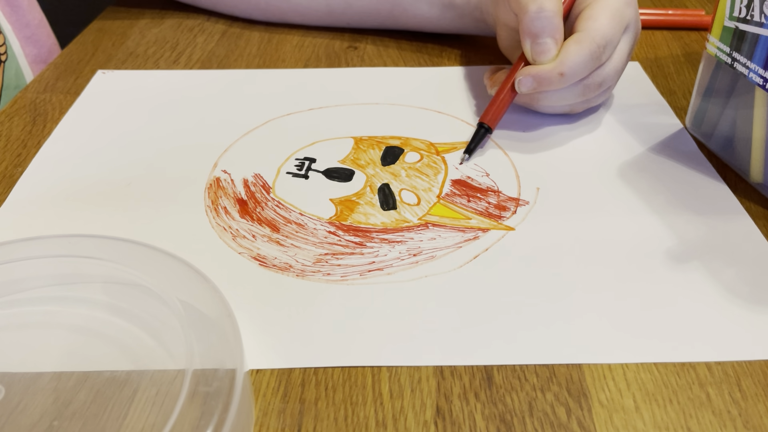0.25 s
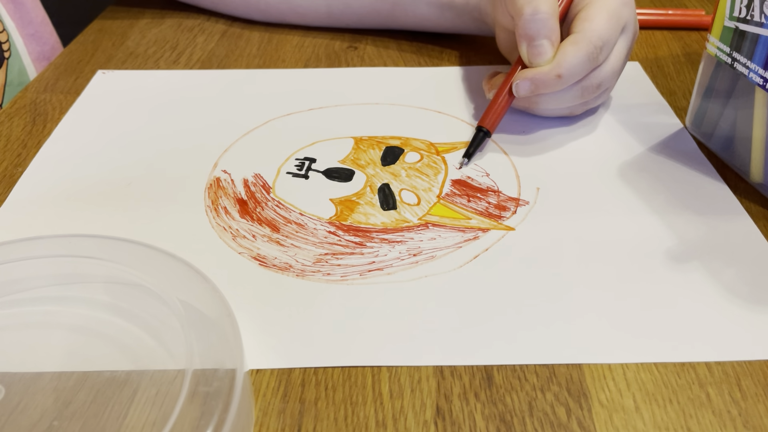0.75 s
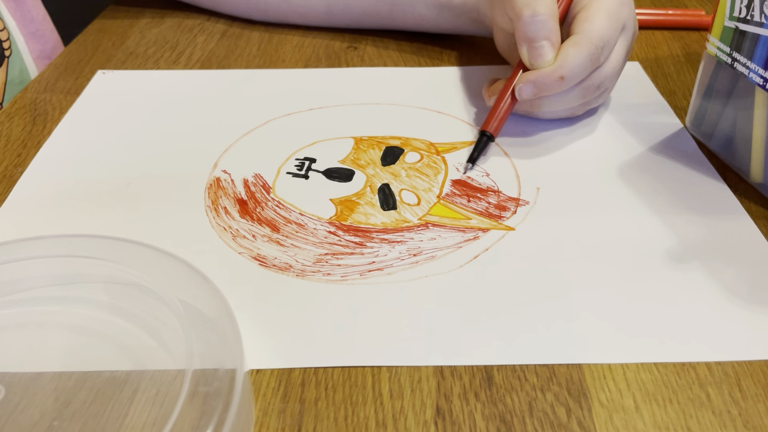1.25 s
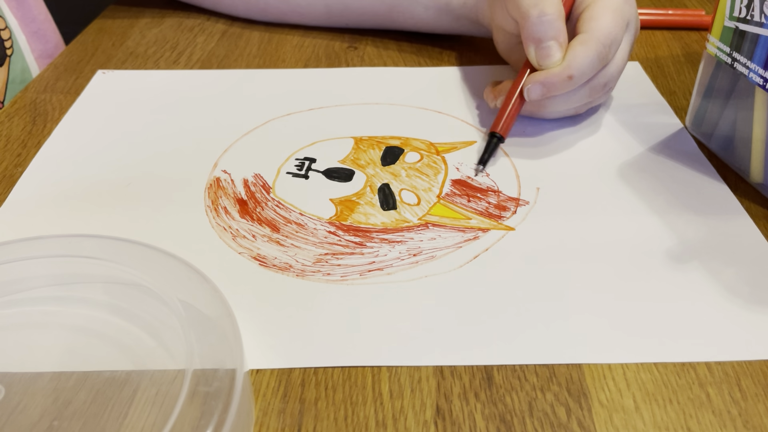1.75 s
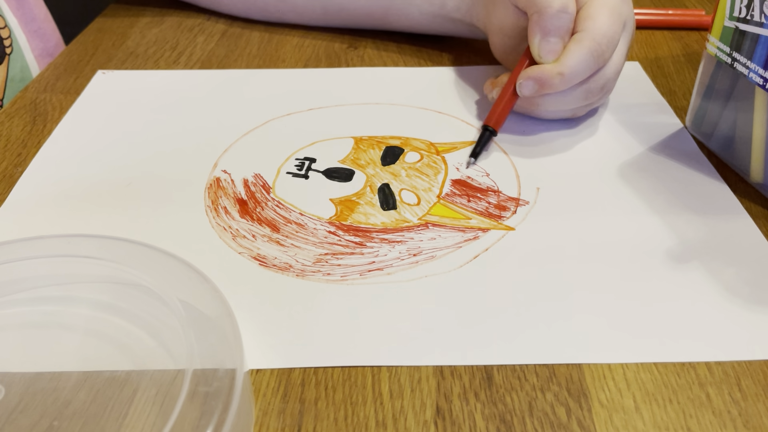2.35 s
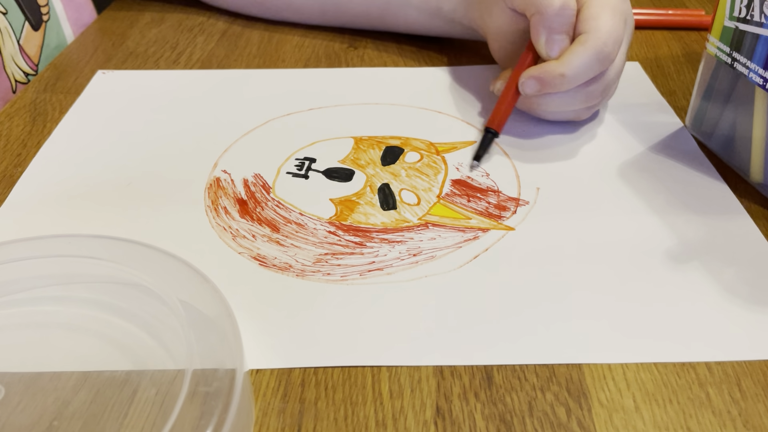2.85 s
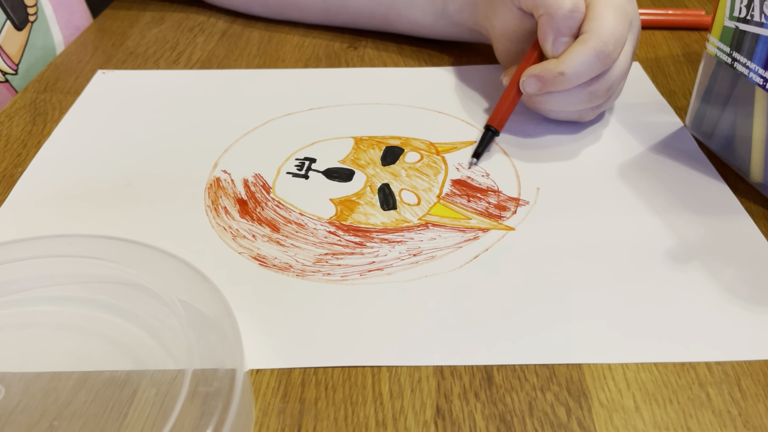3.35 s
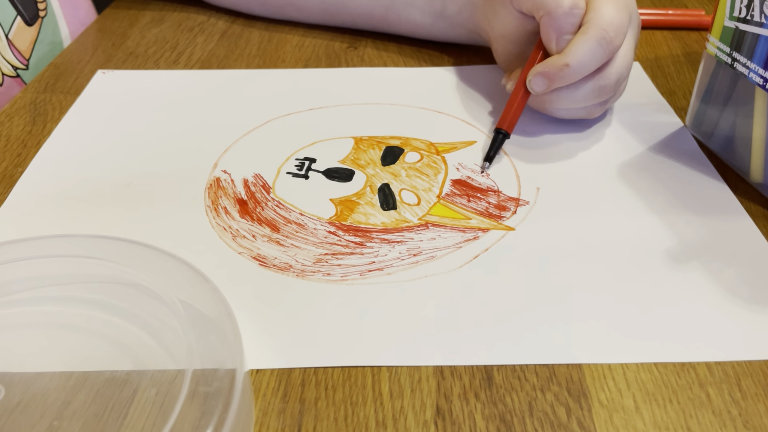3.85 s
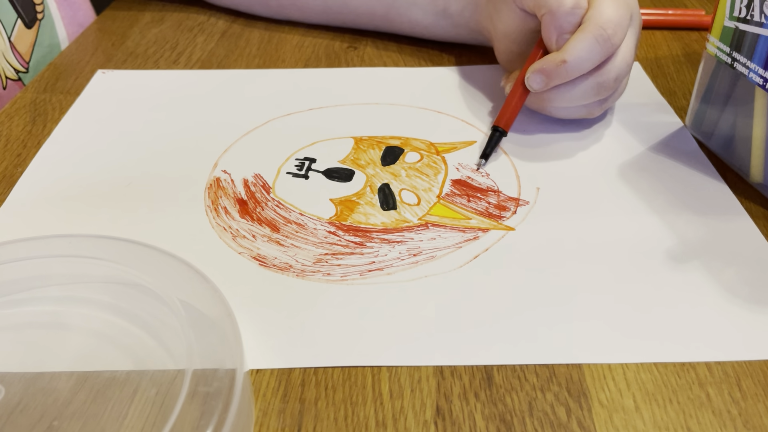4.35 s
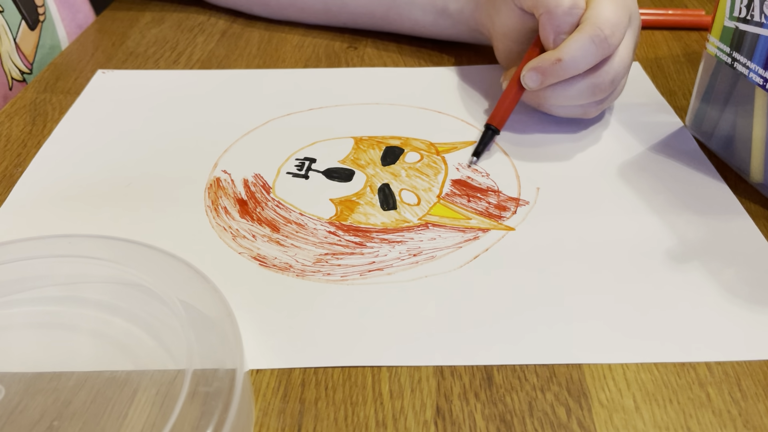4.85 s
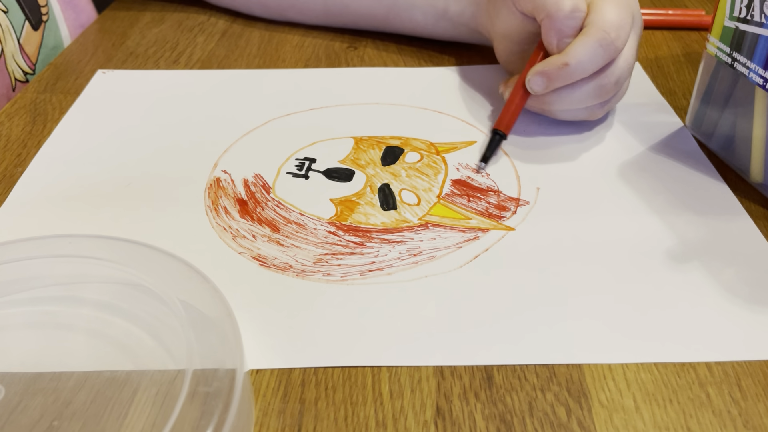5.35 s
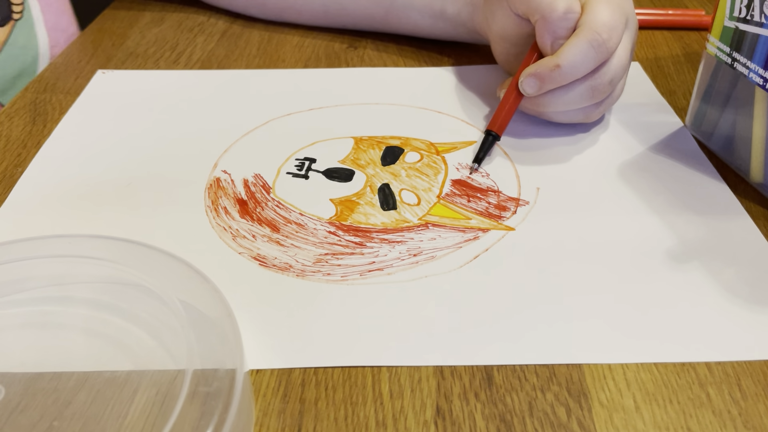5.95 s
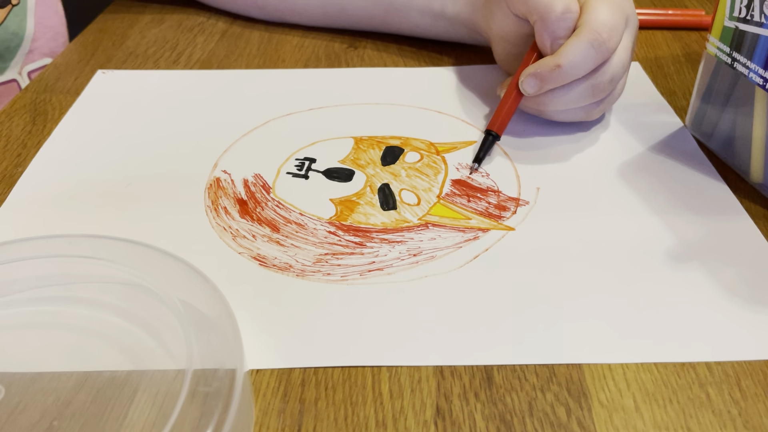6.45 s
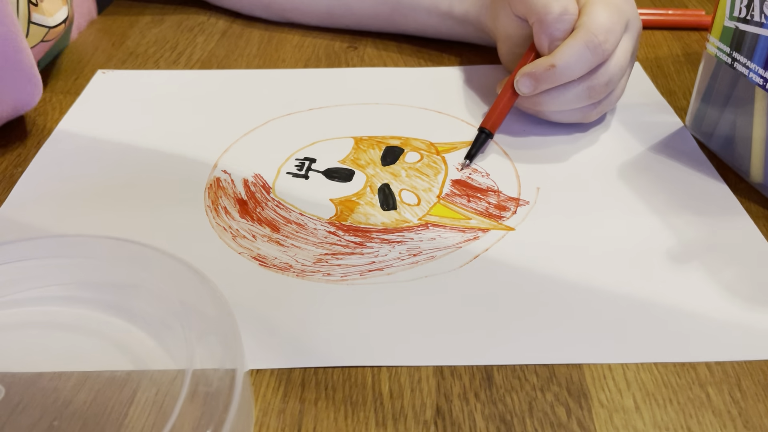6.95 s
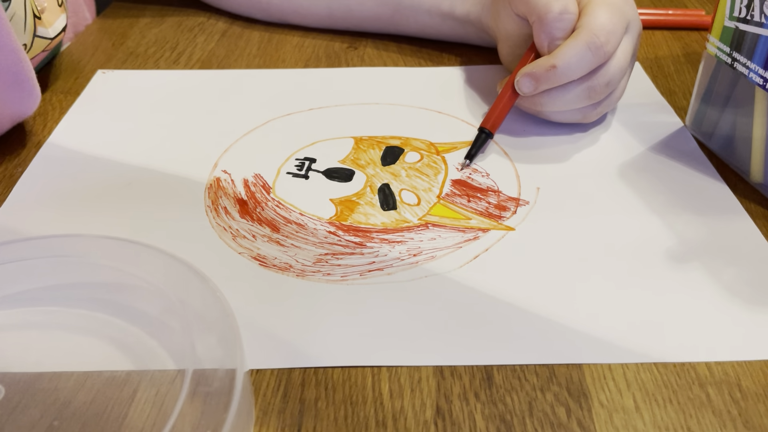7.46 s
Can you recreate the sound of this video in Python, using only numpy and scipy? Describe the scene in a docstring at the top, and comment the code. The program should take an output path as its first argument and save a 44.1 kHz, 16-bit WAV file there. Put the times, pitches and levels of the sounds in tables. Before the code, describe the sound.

A low, steady motor hum and soft, regularly returning water swishes fill a small room, probably from a dishwasher. Near a stereo microphone, a felt-tip nib hisses back and forth on paper, faintly first, then firm and fast, then smoother and lighter. The hand rubs dully, the table thuds softly, and after the last stroke skin brushes the sheet with crisp ticks and rustles.

```python
"""Throughout, a machine across the room, probably a dishwasher, hums while its spray arm swishes evenly round.
A felt-tip pen scribbles on a sheet on a wooden table, close to a two-port microphone: faint strokes at first,
then firmer ones from about 1.6 s as the nib grips the fibres, and mostly gliding ones after 2.3 s.
Each stroke tugs the hand, which rubs dully on the sheet; now and then the table booms or the paper snaps.
The hand slides briefly near 1 s and 4 s, and at length after the last stroke, from 5.65 s on."""
import sys
import numpy as np
from scipy import signal
from scipy.fft import rfft, irfft, next_fast_len
from scipy.io import wavfile
from scipy.ndimage import uniform_filter1d, map_coordinates

SR = 44100
rng = np.random.default_rng(int(sys.argv[2]) if len(sys.argv) > 2 else 0)


def wav_out(sig):
    """Save sig, one row per channel (or a flat mono array), as 16-bit PCM at SR to the path in sys.argv[1]."""
    wavfile.write(sys.argv[1], SR, np.round(np.clip(np.atleast_2d(sig).T, -1, 1) * 32767).astype(np.int16))


N = 339215
TOP_HZ = 15740  # upper limit of the recorder's band
ARCH_DB = 3  # the nib is fastest in the middle of a stroke: hiss, rasp and rub swell by this much

# pen strokes, levels before the swell, the lean and the balance of grip and glide:
# start_s, length_s, nib_hiss_db, paper_rasp_db, hand_rub_db, lean_db (end minus start)
STROKES = [(0.08, 0.031, -92, -108.0, -91.0, -2.0), (0.29, 0.032, -78, -91, -76, -3),
           (0.698, 0.047, -91, -103.0, -86, 0.0), (0.995, 0.046, -77.5, -92, -74, 8),
           (1.146, 0.047, -81.0, -95, -90, -4.0), (1.267, 0.072, -77, -95, -81, 3),
           (1.45, 0.052, -75, -90.5, -87.0, 5), (1.554, 0.055, -73.5, -93, -77, -4),
           (1.685, 0.045, -64.5, -82, -71.0, 0), (1.766, 0.066, -66.5, -80.0, -68.5, -3.5),
           (1.883, 0.065, -68, -85, -69.5, -7), (1.983, 0.088, -71, -88.5, -75, 8),
           (2.118, 0.07, -66, -82.5, -81.0, 3), (2.229, 0.064, -66.5, -79, -75, -6),
           (2.369, 0.097, -68, -82, -82, -8), (2.487, 0.099, -69.0, -77, -76.5, -1.0),
           (2.623, 0.086, -66.5, -74.5, -76, 7.5), (2.733, 0.079, -66, -75.0, -64.0, 4),
           (2.882, 0.088, -70, -79, -70, -12), (2.999, 0.082, -70, -78.5, -65.5, 1),
           (3.121, 0.073, -68.0, -77.5, -65, 3.5), (3.238, 0.074, -68.5, -80.0, -72.5, -1),
           (3.374, 0.094, -72, -87.0, -74.5, 2.0), (3.541, 0.07, -67.5, -81.5, -66.5, -3),
           (3.677, 0.084, -71.5, -83.5, -68, -6), (3.784, 0.073, -71.0, -84.5, -78.0, -2.0),
           (3.937, 0.073, -73, -86, -70, 2), (4.08, 0.055, -74.5, -91, -68.5, 1),
           (4.197, 0.08, -72, -88, -68.5, 5.0), (4.315, 0.055, -70.5, -96.0, -73.0, -2.0),
           (4.45, 0.073, -72.5, -90, -74.5, 1.0), (4.579, 0.079, -77, -89.5, -75.0, 7),
           (4.745, 0.068, -76.0, -92, -77, 5), (4.911, 0.093, -77.5, -92, -80, -8),
           (5.045, 0.062, -75.5, -94.0, -78, -3), (5.176, 0.072, -75.5, -85.0, -69, 4),
           (5.269, 0.088, -77, -88.5, -74, 7), (5.38, 0.086, -76, -87, -73.5, -9),
           (5.5, 0.085, -70.5, -84.5, -68.5, 0), (5.608, 0.055, -70.5, -82, -69, -4)]


def amp(db):
    """Decibels to gain."""
    return 10 ** (np.asarray(db) / 20)


def unit(x):
    """Scale to rms 1."""
    return x / np.sqrt(np.mean(x ** 2) + 1e-30)


def along(points, hz):
    """Read (Hz, value) points on a log frequency axis."""
    f, v = np.transpose(points)
    return np.interp(np.log(hz + 1), np.log(f + 1), v)


def clock():
    """Time of every sample, in seconds."""
    return np.arange(N) / SR


def curves(rows):
    """One value per sample for each column after the time."""
    s, *cols = np.transpose(rows)
    return [np.interp(clock(), s, c) for c in cols]


def wobble(rate):
    """A smooth random curve, rate knots a second."""
    knots = rng.standard_normal(int(N * rate / SR) + 4)
    return map_coordinates(knots, [np.arange(N) * rate / SR])


def gate(t, start, end, rise, fall):
    """A window with soft flanks centred on start and end."""
    opening = (1 + np.tanh((t - start) / rise)) / 2
    closing = (1 + np.tanh((end - t) / fall)) / 2
    return opening * closing


def surge(s, rise, hold, fall):
    """An envelope that climbs to 1 at time s, holds and dies away."""
    t = clock() - s
    exponent = np.where(t < 0, (t / rise) ** 2, np.maximum(t - hold, 0) / fall)
    return np.exp(-np.minimum(exponent, 20))


def filtered(x, response):
    """x times a complex response of frequency."""
    m = next_fast_len(N + SR // 4)
    hz = np.fft.rfftfreq(m, 1 / SR)
    return irfft(rfft(x, m) * response(hz), m)[..., :N]


def coloured(x, spectrum):
    """x through a body with this spectrum, at rms 1; the body passes little far above its last point."""
    top_hz = spectrum[-1][0]
    return unit(filtered(x, lambda hz: amp(along(spectrum, hz)) / (1 + (hz / top_hz / 2) ** 2)))


def friction(rate, spread_db, life, smooth):
    """Fibres catch (rate a second) and let go over life seconds: uneven bursts over a smooth hiss."""
    sizes = amp(spread_db * np.clip(rng.standard_normal(N), -2, 2))
    catches = (rng.random(N) < rate / SR) * sizes
    keep = np.exp(-1 / (life * SR))
    force = signal.lfilter([1], [1, -keep], catches ** 2)
    return unit(np.sqrt(force / force.mean() + smooth ** 2) * rng.standard_normal(N))


def patchy(x, depth_db):
    """The colour drifts as the contact moves: each band swells and sinks on its own for tens of milliseconds."""
    z = signal.stft(x, nperseg=512)[2]
    field = uniform_filter1d(rng.standard_normal(z.shape), size=7, axis=0)  # across frequency
    field = uniform_filter1d(field, size=11, axis=1)  # across time
    return unit(signal.istft(z * amp(depth_db * unit(field)), nperseg=512)[1][:N])


def ports(direct, diffuse):
    """Direct sound meets the ports with a phase and level difference; diffuse sound is unrelated between them."""
    # what the two ports share: hz, likeness (0-1)
    likeness = [(60, .98), (150, .87), (300, .72), (550, .3), (1000, .12), (2000, .55), (3000, .45),
                (4700, .68), (6000, .45), (7200, .58), (8300, .98), (10500, .92), (12500, .95),
                (14000, .99)]
    # how far the left port leads: hz, lead_rad
    phase_lead = [(100, 0), (500, .4), (900, 1.5), (1700, -.8), (3100, 1.3), (5200, .7), (5800, -1.2),
                  (6800, -1.3), (7600, -2.6), (8600, -3.2), (10000, -4.1), (12000, -5.3), (13200, -6.2),
                  (15500, -6.4)]
    # how much louder the left port is: hz, left_minus_right_db
    side_tilt = [(100, 7), (600, 0), (1900, 2), (2800, 5), (5000, 4.5), (5800, 2.5), (7200, 1), (8600, 0)]
    sides = np.array([[1], [-1]])
    share = lambda hz: np.clip(along(likeness, hz), 0, .995)
    tilt = lambda hz: amp(sides * along(side_tilt, hz) / 2)
    turn = lambda hz: np.exp(1j * sides * along(phase_lead, hz) / 2)
    near = filtered(direct, lambda hz: tilt(hz) * np.sqrt(share(hz)) * turn(hz))
    return near + filtered(diffuse, lambda hz: tilt(hz) * np.sqrt(1 - share(hz)))


def distant(pair, spectrum):
    """Two unrelated signals as one coloured sound that reaches the ports from all sides."""
    # sound from across the room: hz, left_right_likeness (-1 to 1)
    far_likeness = [(60, 1), (110, 0.88), (200, 0.81), (380, 0.44), (550, -0.44), (800, -0.21),
                    (1300, -0.43), (2400, 0.057), (4400, -0.35)]
    turn = lambda hz: np.arccos(np.clip(along(far_likeness, hz), -1, 1)) / 2
    mid_side = lambda hz: np.array([np.cos(turn(hz)), np.sin(turn(hz))])
    mid, side = filtered(coloured(pair, spectrum), mid_side)
    return unit(np.array([mid + side, mid - side]))


def room(x, early_s, late_db):
    """Quick reflections from the table and things on it, then a faint tail; the pattern keeps shifting."""
    # decay of the room's tail: hz, t60_s
    tail_t60 = [(200, 0.3), (2000, 0.36), (12000, 0.51)]
    step, length = SR // 22, SR // 5
    x = np.pad(x, (step, 2 * step))
    fade = np.sin(np.pi * np.arange(2 * step) / (2 * step))
    out = np.zeros((2, N + SR))
    for i in range(0, N + step, step):  # overlapping pieces, each with a new echo pattern
        hz, t, z = signal.stft(rng.standard_normal((2, length)), SR, nperseg=128)
        late = amp(late_db - 60 * t / along(tail_t60, hz)[:, None])
        decay = np.exp(-t / early_s) + late
        decay = decay / np.linalg.norm(decay, axis=1, keepdims=True)
        tail = signal.istft(z * decay, SR, nperseg=128)[1]
        tail = tail / np.linalg.norm(tail, axis=1, keepdims=True)
        echo = signal.fftconvolve(fade * x[None, i:i + 2 * step], tail, axes=1)
        out[:, i:i + echo.shape[1]] += echo
    return out[:, step:step + N]


def background():
    """The pump motor's slightly unsteady hum and its overtones over the soft noise of the room."""
    # hum of the pump motor, rms before small wavering: time_s, level_db
    hum_level = [(0, -50.5), (1.6, -51), (1.74, -52.5), (1.9, -50.5), (5.3, -50.5), (6.1, -52.5),
                 (6.8, -52), (7.1, -50), (7.4, -47), (7.69, -45.5)]
    # the motor's overtones, rms before small wavering: multiple, level_db
    overtones = [(2, -71.5), (3, -73.5)]
    # room noise: hz, level_db (relative)
    air_colour = [(20, -15.5), (45, 4.5), (70, -1), (110, 2.5), (260, -8), (450, -14.5), (700, -33),
                  (1200, -32.5), (2000, -38.5), (4800, -42), (6000, -43), (10500, -42.5), (12000, -37),
                  (13800, -62.5)]
    hum_hz = 47.36
    turn = 2 * np.pi * hum_hz * clock() + 0.022 * wobble(2.2)
    hum = amp(curves(hum_level)[0] + 0.19 * wobble(9.0)) * np.sin(turn)
    for multiple, db in overtones:
        hum = hum + amp(db + wobble(9.3)) * np.sin(multiple * turn + 2 * np.pi * rng.random())
    shared_air = coloured(rng.standard_normal(N), air_colour)
    loose_air = coloured(rng.standard_normal((2, N)), air_colour)
    hum_pair = np.sqrt(2) * hum * amp([[-.3], [.3]])  # a touch louder on the right
    return hum_pair + amp(-62.0) * ports(shared_air, loose_air)


def dishwasher():
    """Water drums and rains in the tub; the turning spray arm sweeps its jets over the wall at a fixed period."""
    # jets striking the tub wall, repeated every turn: peak_s (in the first turn), level_db, rise_s, hold_s, fall_s
    sweeps = [(0.357, -57.5, 0.022, 0.054, 0.061), (0.546, -68, 0.046, 0.019, 0.16),
              (1.405, -68.5, 0.055, 0.035, 0.1), (2.237, -74, 0.035, 0.061, 0.067)]
    # a jet on the wall: hz, level_db (relative)
    swish_colour = [(120, -16), (250, 3.5), (380, 4), (520, 0), (750, -4), (1000, -9), (1200, -7),
                    (1400, -17.5), (1900, -23.5), (2300, -21.5), (2700, -26), (3200, -34), (6000, -46)]
    # water raining through the tub: hz, level_db (relative)
    wash_colour = [(200, -8.5), (350, -0.5), (500, -2.5), (750, -12), (1100, -17), (1600, -27),
                   (3000, -37.5)]
    # water drumming in the tub, before small wavering: time_s, level_db
    drumming_level = [(0, -68.5), (.5, -61), (.8, -67), (1.9, -62), (2.48, -65.5), (3.1, -60), (3.8, -64.5),
                      (5.7, -63), (6.6, -65.5), (7.04, -71.5), (7.19, -61), (7.69, -70)]
    # the drumming tub: hz, level_db (relative)
    tub_colour = [(60, -34.5), (95, -11.5), (120, -5), (165, -6), (195, 4.5), (225, -1.5), (265, 4),
                  (300, -1.5), (335, 1), (430, -11.5), (560, -17), (900, -40)]
    turn_s, wash_db = 2.658, -71

    def spatter():
        """Two unrelated streams of drops."""
        return np.array([friction(rate=520, spread_db=3.5, life=.0015, smooth=1.1) for _ in range(2)])

    jet_power = np.zeros(N)
    for turn in np.arange(0, N / SR, turn_s):
        for peak, db, rise, hold, fall in sweeps:
            jet_power += (amp(db) * surge(peak + turn, rise, hold, fall)) ** 2
    swish = np.sqrt(jet_power) * amp(.5 * wobble(60)) * distant(spatter(), swish_colour)
    wash = amp(wash_db + 2.6 * wobble(15)) * distant(spatter(), wash_colour)
    drum_gain = amp(curves(drumming_level)[0] + 0.61 * wobble(11))
    drumming = drum_gain * distant(rng.standard_normal((2, N)), tub_colour)
    return swish + wash + drumming


def table_top():
    """The table's lowest mode murmurs under the arm and booms at a bump."""
    # the arm bumps the table: peak_s, level_db (rms of the ring at its height)
    arm_bumps = [(.49, -62), (1.04, -62.5), (1.89, -57.5), (2.07, -62), (2.83, -63), (3.259, -59.5),
                 (4.129, -63), (5.53, -58.5)]
    # the table's lowest mode: hz, level_db (relative)
    boom_colour = [(90, -43), (128, -14.5), (138, 1), (147, 6.5), (158, -22.5), (220, -36)]
    boom_hz, murmur_db = 144, -72
    bumps = sum(amp(db) * surge(peak, rise=0.057, hold=0, fall=0.076) for peak, db in arm_bumps)
    ring = np.sqrt(2) * np.sin(2 * np.pi * boom_hz * clock() + .9 * wobble(22))
    return bumps * ring + amp(murmur_db) * coloured(rng.standard_normal(N), boom_colour)


def snaps():
    """The paper ticks as it buckles: a brief ring inside a puff of noise."""
    # small snaps of the paper: time_s, level_db, centre_hz, t60_s, ring_share (0-1)
    paper_snaps = [(2.614, -55, 8850, .008, .2), (5.949, -52, 11500, .008, .1),
                   (5.962, -46, 12000, .009, .1), (5.985, -42.5, 1900, .016, .7),
                   (5.989, -53, 4850, .01, .55), (6.003, -54.5, 2050, .022, .6),
                   (6.019, -50, 11400, .011, .3), (6.039, -60, 4950, .025, .3), (6.075, -56, 900, .025, .6),
                   (6.18, -55.5, 1150, .025, .7), (6.191, -56, 11400, .04, .1),
                   (6.864, -56, 1700, .025, .6), (6.962, -65, 2400, .012, .3),
                   (7.299, -57, 10000, .008, .2)]
    puff_q = 2.5
    out, t = np.zeros(N + SR), np.arange(SR // 8) / SR
    for s, db, hz, t60, ring in paper_snaps:
        band = signal.iirpeak(min(hz, TOP_HZ), puff_q, SR)
        puff = signal.lfilter(*band, rng.standard_normal(len(t)))
        puff = unit(signal.lfilter(*band, puff))
        tick = ring * np.sin(2 * np.pi * hz * t) + (1 - ring) * puff * .6
        tick = tick * np.exp(-np.log(1000) * t / t60)
        out[round(s * SR):][:len(t)] += amp(db) * tick
    return out[:N]


def hand_slides():
    """Skin slides over the paper with a fine bright hiss and sets the sheet sounding, higher as it is pulled taut."""
    # one curve per slide, before small wavering: time_s, skin_friction_db, sheet_resonance_db
    slides = [
        [(.72, -110, -87), (.8, -104, -84.5), (.95, -102, -86.5), (1.04, -88, -83), (1.13, -99, -85),
         (1.17, -110, -102)],
        [(3.87, -85, -85), (3.95, -76, -77.5), (4.03, -91, -87), (4.11, -82, -76.5), (4.2, -83, -84.5),
         (4.38, -94, -86), (4.46, -98, -91)],
        [(5.65, -77, -72), (5.76, -74, -78), (5.86, -74.5, -71), (5.99, -66.5, -71), (6.07, -71, -68),
         (6.13, -62, -68.5), (6.18, -67, -74.5), (6.21, -69, -81), (6.235, -74.5, -83), (6.42, -70.5, -78.5),
         (6.51, -72.5, -81), (6.58, -69.5, -73.5), (6.66, -70, -69), (6.71, -70, -69), (6.78, -73, -76.5),
         (6.87, -70, -77.5), (6.98, -75, -75.5), (7.07, -78.5, -86.5), (7.15, -76, -81), (7.22, -73, -76),
         (7.3, -84.5, -95), (7.46, -87, -100), (7.59, -78.5, -80.5), (7.69, -88, -90)],
    ]
    # skin on paper: hz, level_db (relative)
    skin_colour = [(1400, -24), (2600, -5), (3300, 0.5), (4200, -3.5), (4900, -3), (5700, -4.5),
                   (7000, -1.5), (8500, -5), (9800, 6), (11200, 4.5), (12200, 7.5), (13200, -2.5),
                   (15500, -11.5)]
    # the sheet lying slack: hz, level_db (relative)
    slack_colour = [(400, -35), (800, 1), (1000, -14), (1250, 0.5), (1450, -2.5), (1850, 0), (2080, -0.5),
                    (2280, -1.5), (2650, -16.5), (4500, -14.5), (7000, -44)]
    # the sheet pulled taut: hz, level_db (relative)
    taut_colour = [(400, -31), (800, 4), (1200, -5), (1550, -3.5), (1800, -0.5), (2100, -3), (2500, -3.5),
                   (2950, -2), (3400, -14.5), (4300, -11), (7000, -19)]
    # how far the hand stretches the sheet, before small wavering: time_s, share (0-1)
    stretch = [(.8, 0.4), (1.05, 0.9), (4.1, 0.4), (4.35, 1), (5.8, 0.47), (6.15, 0.44), (6.4, 0.8),
               (6.65, 0.07), (7.15, 0), (7.22, 0.85)]
    # light, thin brushes over the paper: start_s, end_s, level_db
    brushes = [(4.234, 4.395, -70.5), (5.744, 5.964, -76.5), (5.99, 6.16, -69.5)]
    # a brush on paper: hz, level_db (relative)
    brush_colour = [(1200, -9), (2500, -4), (4200, 1.5), (4800, -2.5), (5350, 5.5), (6200, -3), (7600, 6.5),
                    (9000, 8), (10200, 5), (11500, -1), (15000, -22)]
    slide_edge_s, brush_edge_s = 0.011, 0.036

    def rustle(spectrum):
        """The sheet stirred by the skin's catches."""
        return coloured(friction(rate=400, spread_db=5, life=.001, smooth=1.4), spectrum)

    t, skin, sheet = clock(), np.zeros(N), np.zeros(N)
    for slide in slides:
        s, skin_db, sheet_db = np.transpose(slide)
        contact = gate(t, s[0], s[-1], slide_edge_s, slide_edge_s)
        skin += contact * amp(np.interp(t, s, skin_db))
        sheet += contact * amp(np.interp(t, s, sheet_db))
    fine = friction(rate=500, spread_db=4.5, life=.0003, smooth=1.2)
    skin = skin * amp(0.73 * wobble(40)) * coloured(patchy(fine, depth_db=0.9), skin_colour)
    taut = np.clip(curves(stretch)[0] + 0.072 * wobble(12), 0, 1)
    resonance = np.sqrt(1 - taut) * rustle(slack_colour) + np.sqrt(taut) * rustle(taut_colour)
    sheet = sheet * amp(0.29 * wobble(35)) * resonance
    brush = sum(amp(db) * gate(t, start, end, brush_edge_s, brush_edge_s) for start, end, db in brushes)
    return skin + sheet + brush * coloured(rng.standard_normal(N), brush_colour)


def stroking(levels_db, arch_db, rise, fall):
    """Envelope of the strokes at these levels: each bites, swells, leans on its start or its end and lets go."""
    t, out = clock(), np.zeros(N)
    for (start, length, *_, lean_db), db in zip(STROKES, levels_db):
        near = (t > start - .1) & (t < start + length + .1)
        way = np.clip((t[near] - start) / length, 0, 1)
        shape_db = arch_db * (np.sin(np.pi * way) - 2 / np.pi) + lean_db * (way - .5)
        out[near] += amp(db + shape_db) * gate(t[near], start, start + length, rise, fall)
    return out


def hand_rub():
    """Each stroke tugs the hand, which rubs dully on the sheet a moment later; a further dull rub swells twice."""
    # a further dull rub swells briefly near 2.95 s and 5.75 s: start_s, end_s, level_db
    dull_swells = [(2.91, 2.99, -69), (5.63, 5.9, -69)]
    # the dull rub: hz, level_db (relative)
    rub_colour = [(150, -14), (330, 3), (520, 6), (800, 1.5), (1170, -2), (1600, -12.5), (2300, -15),
                  (3000, -26.5), (5000, -40)]
    tug_lag_s = 0.0053
    t = clock()
    rub_db = np.transpose(STROKES)[4]
    tugs = np.interp(t - tug_lag_s, t, stroking(rub_db, ARCH_DB, rise=0.014, fall=0.019))
    dull_swell = sum(amp(db) * gate(t, start, end, .04, .04) for start, end, db in dull_swells)
    rub = friction(rate=450, spread_db=4, life=.001, smooth=.85)
    return np.hypot(tugs, dull_swell) * coloured(rub, rub_colour)


def pen():
    """Each stroke drags the nib over the fibres: the nib rings high, the sheet rasps below."""
    # how hard the nib grips, before small wavering: time_s, grip (0-1)
    grip_curve = [(0, 0.66), (1.6, 0.9), (2.17, 1), (2.3, 0.12), (4.4, 0.18)]
    # the gripping nib: hz, level_db (relative)
    nib_gripping = [(6500, -58), (8000, -47), (9000, -38), (9800, -30), (10300, 1), (10800, -11),
                    (11450, 5.5), (12400, 1), (13100, -23), (14200, -24), (15500, -22)]
    # the gliding nib: hz, level_db (relative)
    nib_gliding = [(6500, -61), (7900, -5.5), (8500, -34), (9200, 2.5), (10100, 0), (10900, -2),
                   (11700, 3.5), (12300, 6.5), (13100, 1.5), (14200, -7.5), (15500, -6.5)]
    # the sheet under a gripping nib: hz, level_db (relative)
    paper_gripped = [(300, -34), (750, 2.5), (1200, -16), (1900, -23), (2600, -15), (3250, -8), (3750, -15),
                     (4350, -5.5), (5100, -12.5), (5650, -18), (6800, -5.5), (7700, -16.5), (10000, -48)]
    # the sheet under a gliding nib: hz, level_db (relative)
    paper_glided = [(300, -3), (700, -10.5), (1200, -13), (1700, -14), (2300, -5.5), (2700, -10),
                    (3250, -17), (3800, -11), (4400, -8.5), (5100, -1), (5700, -10), (6800, -19),
                    (7700, -9), (10000, -50)]
    nib_patchy_db = 1.8
    _, _, hiss_db, rasp_db, _, _ = np.transpose(STROKES)
    hiss = stroking(hiss_db, ARCH_DB, rise=.0035, fall=.0105)
    rasp = stroking(rasp_db, ARCH_DB, rise=.005, fall=.016)
    hiss = hiss + amp(-15.5) * uniform_filter1d(hiss, size=SR // 8)  # the nib still creeps while it turns
    pressure = amp(.6 * wobble(45))
    # a gripping nib moves in coarse catches, a gliding one in a finer grain
    coarse = friction(rate=1100, spread_db=3.5, life=.0006, smooth=.8)
    fine = friction(rate=1400, spread_db=3.5, life=.0003, smooth=.9)
    catching = pressure * patchy(coarse, nib_patchy_db)
    gliding = pressure * patchy(fine, nib_patchy_db)
    gripped = hiss * amp(0.5) * coloured(catching, nib_gripping)
    gripped = gripped + rasp * amp(8.0) * coloured(catching, paper_gripped)
    glided = hiss * amp(-0.5) * coloured(gliding, nib_gliding)
    glided = glided + rasp * amp(0.5) * coloured(gliding, paper_glided)
    grip = np.clip(curves(grip_curve)[0] + 0.065 * wobble(4.5), 0, 1)  # the bite varies between strokes
    return np.sqrt(grip) * gripped + np.sqrt(1 - grip) * glided


def scene():
    """Pen and hand on the table close by, with the machine running across the room."""
    desk = table_top() + hand_slides() + hand_rub() + pen()
    ticks = snaps()
    echoes = room(desk + ticks / 2, early_s=0.0046, late_db=-14.0)
    return background() + dishwasher() + ports(desk + ticks, echoes)


def record(dry):
    """The recorder keeps nothing above its band limit."""
    return filtered(dry, lambda hz: hz < TOP_HZ)


dry = scene()
out = record(dry)
wav_out(out)
```